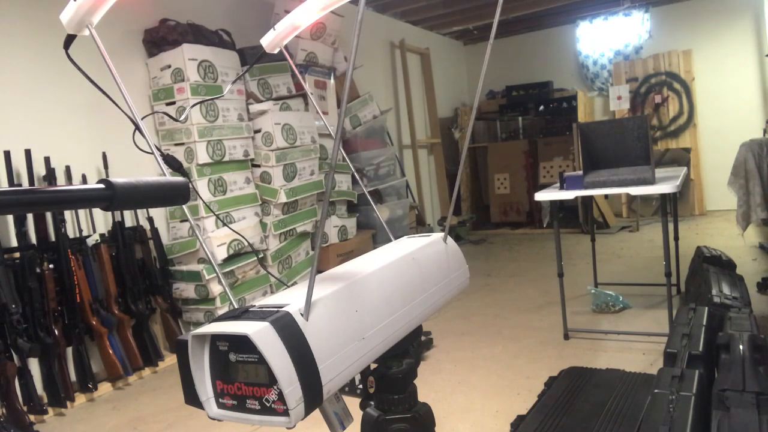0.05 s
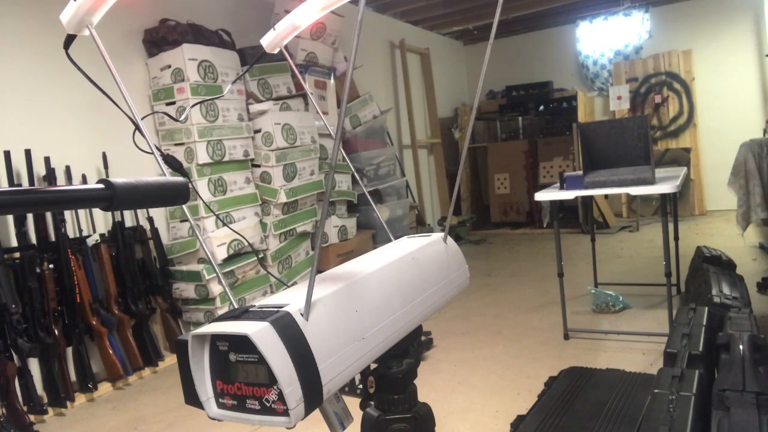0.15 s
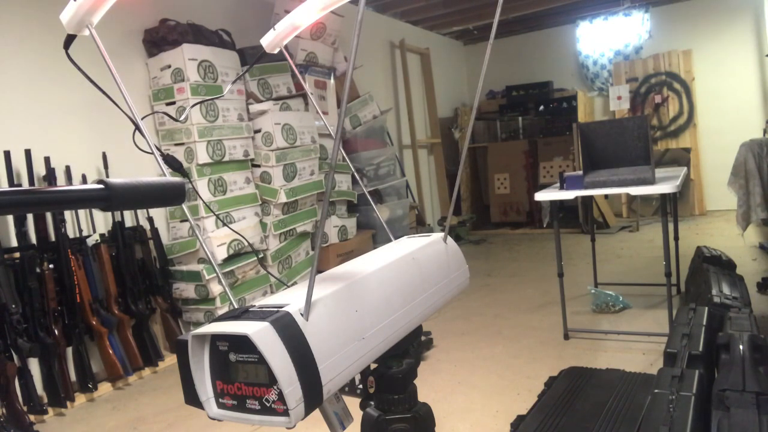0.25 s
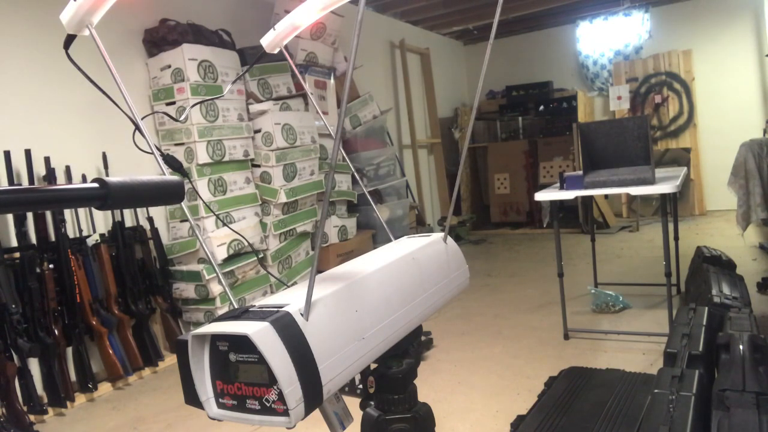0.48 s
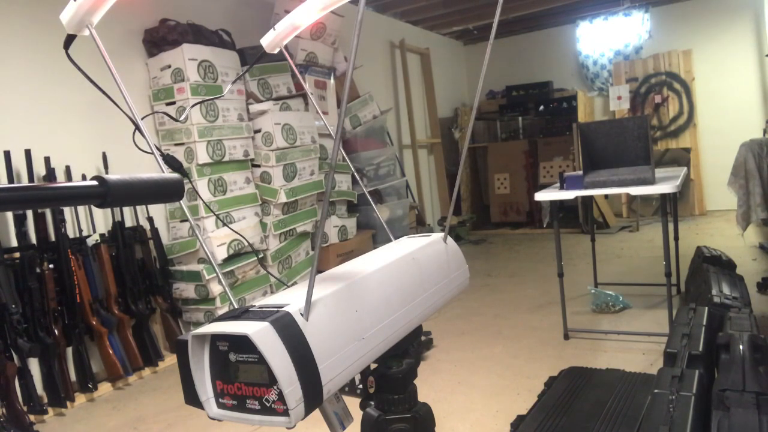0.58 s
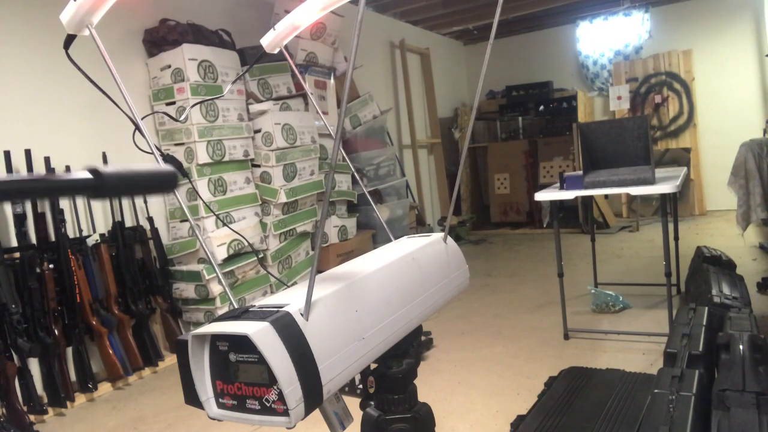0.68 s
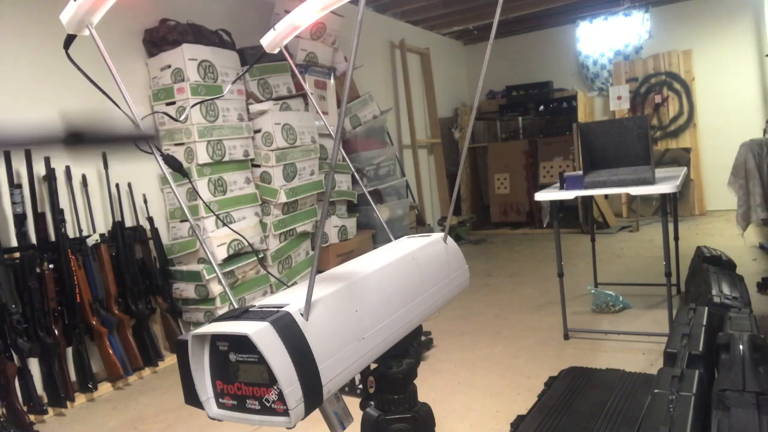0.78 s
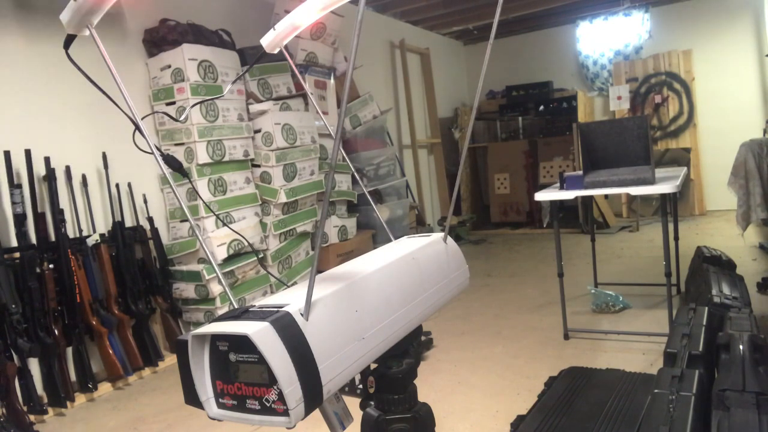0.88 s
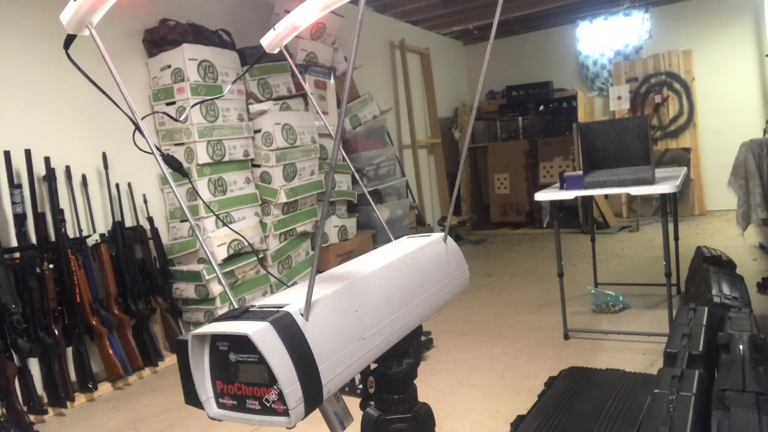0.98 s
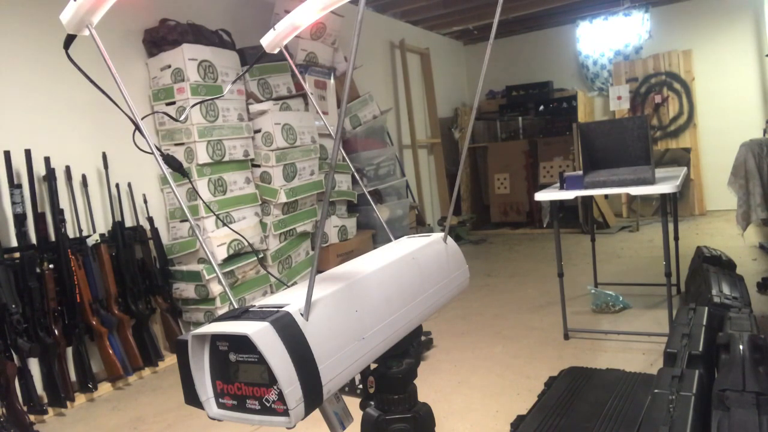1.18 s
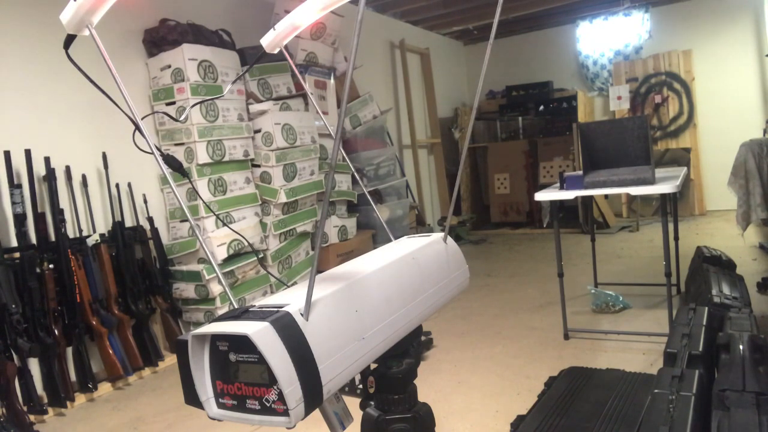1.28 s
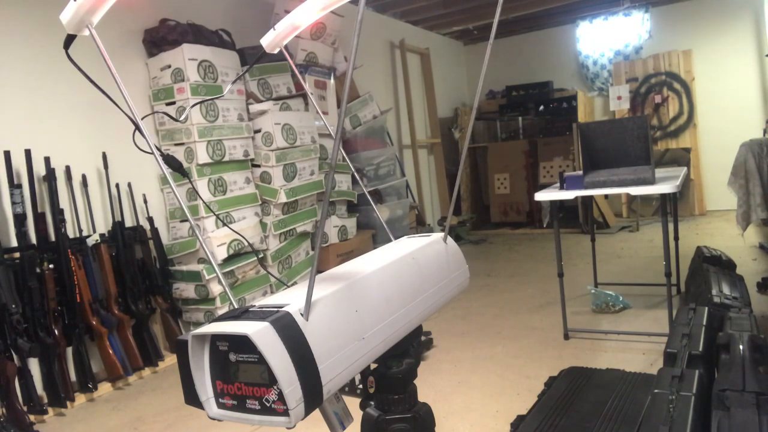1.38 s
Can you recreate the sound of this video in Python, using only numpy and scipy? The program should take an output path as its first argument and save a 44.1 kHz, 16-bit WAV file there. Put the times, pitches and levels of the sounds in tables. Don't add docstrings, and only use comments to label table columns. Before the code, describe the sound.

A spring-piston air rifle fires once close by in a basement: tiny trigger clicks and spring scrape, hard airy crack, low thump, pellet smacking ringing steel down range, then faint hand ticks over quiet hum.

```python
import sys
import numpy as np
from scipy import signal
from scipy.io import wavfile

SR = 44100
rng = np.random.default_rng(int(sys.argv[2]) if len(sys.argv) > 2 else 0)


def wav_record(signal):
    frames = np.transpose(np.atleast_2d(signal))
    bounded = np.clip(frames, -1, 1)
    quanta = np.round(bounded * 32767).astype(np.int16)
    wavfile.write(sys.argv[1], SR, quanta)


def volts_from_decibels(level):
    exponent = np.asarray(level, float) / 20
    return 10 ** exponent


N = 63945
T = np.arange(N) / SR
BLAST_S, THUMP_S, HIT_S = .2008, .2093, .2344
WALLS_BUILD_S = .012


def rms_one(x):
    return x / np.sqrt(np.mean(x ** 2) + 1e-20)


def since(start_s):
    return np.maximum(T - start_s, 0)


def at_hz(points, hz):
    table_hz, value = np.array(points)[:, 0], np.array(points)[:, 1]
    return np.interp(np.log(hz), np.log(table_hz), value)


def drift(rate_hz):
    r = np.exp(-2 * np.pi * rate_hz / SR)
    settle = 9000
    return rms_one(signal.lfilter([1], [1, -2 * r, r * r], rng.standard_normal(N + settle))[settle:])


def click(s, db):
    return volts_from_decibels(db) * (np.arange(N) == int(s * SR))


def ring(x, modes):
    out = 0
    for hz, db, t60 in modes:
        r = volts_from_decibels(-60 / (t60 * SR))
        w = 2 * np.pi * hz / SR
        out = out + volts_from_decibels(db) * signal.lfilter([0, np.sin(w)], [1, -2 * r * np.cos(w), r * r], x + 1e-18)
    return out


def echoes(x, t60):
    tail = rng.standard_normal(N) * volts_from_decibels(-60 * T / t60) * (1 - np.exp(-T / .006))
    return signal.fftconvolve(x, tail / np.sqrt(np.sum(tail ** 2)))[:N]


# frequency in Hz, t60 in seconds.
ROOM_DECAY = [(60, .25), (250, .5), (700, .52), (1500, .54), (3000, .52), (6000, .47), (10000, .37),
              (13000, .29), (16000, .17)]


def room_fade(age, hz, share=1.):
    return volts_from_decibels(-60 * age / (share * at_hz(ROOM_DECAY, hz)))


def bands(spectrum, patchy_db, start=None, attack=1., share=1.):
    edges = 25 * 2 ** np.arange(0, 9.5, 1 / 3)
    white = rng.standard_normal((2, N))
    wobble = [drift(3), drift(25), drift(36)]
    out, power = 0, 0
    for k, (low, high) in enumerate(zip(edges, edges[1:])):
        hz = np.sqrt(low * high)
        band_filter = signal.butter(2, [low, high], "band", fs=SR, output="sos")
        band = volts_from_decibels(at_hz(spectrum, hz)) * signal.sosfilt(band_filter, white[k % 2])
        power += np.mean(band ** 2)
        if start is not None:
            age = since(start)
            band = band * room_fade(age, hz, share) * (1 - np.exp(-age / attack))
        out = out + band * volts_from_decibels(patchy_db * wobble[k % 3])
    return out / np.sqrt(power)


# frequency in Hz, level in dB per Hz.
BLAST_COLOUR = [(200, -15.5), (450, -5), (1000, -12.5), (1500, -9.5), (2200, -4), (4000, -1.5),
                (9000, -7.5), (16000, -12.5)]


def muzzle():
    puff = 1 + 0.24 * np.exp(-since(BLAST_S) / .012)
    return volts_from_decibels(-11.5) * puff * bands(BLAST_COLOUR, 1.2, BLAST_S, attack=.0015)


# frequency in Hz, level in dB, t60 in seconds.
STOCK_MODES = [(150, -17, .08), (260, -27.5, .08), (508.4, -15.5, 0.053), (619.2, -22, .07)]


def piston():
    from_hz, to_hz, fall_s = 215, 50, .008
    level_db, hold_s, t60_s = -16.5, .012, .051
    age = since(THUMP_S)
    hz = to_hz + (from_hz - to_hz) * np.exp(-age / fall_s)
    fade = volts_from_decibels(level_db - 60 * np.maximum(age - hold_s, 0) / t60_s)
    push = np.sin(2 * np.pi * np.cumsum(hz * (age > 0)) / SR) * fade
    knock = ring(click(THUMP_S + .004, 0), STOCK_MODES)
    thump = push + knock
    return thump + volts_from_decibels(-18.5) * echoes(thump, 0.58)


PLATE_HZ = [1241, 1890, 2169, 2530, 2822, 3192, 3660, 4308, 4643, 5415, 6085, 7004, 8037, 9641]
# level in dB, t60 in seconds.
PLATE_RING = [(-15.5, .25), (-13.5, 0.11), (-27, 0.47), (-20, 0.34), (-21, 0.14), (-16.5, 0.17),
              (-15.5, 0.09), (-10.5, 0.11), (-28.5, 0.34), (-14.5, 0.1), (-15.5, 0.049), (-15.5, 0.22),
              (-28.5, 0.07), (-30.5, 0.18)]
FRAME_MODE_HZ = [1430, 1522, 1669, 2051, 2613, 3122, 3531, 3754, 4130, 6620, 8489, 10508]
# level in dB, t60 in seconds.
FRAME_RING = [(-33, .35), (-36, 0.4), (-27, .3), (-27.5, 0.34), (-29, .35), (-19.5, 0.11), (-27.5, 0.43),
              (-28.5, .15), (-22, 0.3), (-23.5, 0.18), (-23, 0.19), (-30.5, 0.092)]
# frequency in Hz, level in dB per Hz.
SPLASH_COLOUR = [(180, -54), (300, -29.5), (994, -35.5), (1230, -17), (1360, -19), (1870, -11.5),
                 (4830, -14.5), (6850, -4), (16000, -10.5)]


def trap():
    plate_direct, frame_direct = .55, .5
    modes = [(hz, *strength, plate_direct) for hz, strength in zip(PLATE_HZ, PLATE_RING)]
    modes += [(hz, *strength, frame_direct) for hz, strength in zip(FRAME_MODE_HZ, FRAME_RING)]
    for hz in np.geomspace(1353.3, 9290, 44):
        minor_hz, minor_db = hz * rng.uniform(0.99, 1.03), -29 + rng.normal(0, 0.67)
        modes.append((minor_hz, minor_db, 0.1 * (2500 / hz) ** 0.13, plate_direct))
    age, hit = since(HIT_S), click(HIT_S, 0)
    build = 1 - np.exp(-age / WALLS_BUILD_S)
    out = 0
    for *mode, near in modes:
        direct = rng.choice([-1, 1]) * ring(hit, [mode])
        paths = rng.standard_normal(N) * build * room_fade(age, mode[0], share=.92)
        walls = ring(paths, [mode])
        mixed = rms_one(near * rms_one(direct) + rms_one(walls))
        out = out + mixed * np.sqrt(np.mean(direct ** 2))
    return out + volts_from_decibels(-17) * bands(SPLASH_COLOUR, 1.5, HIT_S, attack=.003, share=1.04)


# frequency in Hz, level in dB, t60 in seconds.
BAR_MODES = [(770, -29, .77), (951, -39, .9), (1125, -25.5, 1.13)]


def free_bars():
    return ring(click(HIT_S, 0), BAR_MODES) * (1 - np.exp(-since(HIT_S) / WALLS_BUILD_S))


# start in seconds, peak level in dB.
SEAR_CLICKS = [
    (.1805, -35),
    (.1812, -38),
    (.1862, -33),
    (.1872, -31),
    (.1915, -35),
    (.1945, -37),
]
# frequency in Hz, level in dB per Hz.
SCRAPE_COLOUR = [(180, -42), (300, -10), (2250, -8), (2570, -5), (2840, -8), (13100, -20.5), (16000, -29)]


def action():
    impulses = sum(click(s, db) for s, db in SEAR_CLICKS)
    clicks = signal.lfilter([1, -1], [1, -.3], impulses)
    start_s, end_s = .181, .202
    along = (T - start_s) / (end_s - start_s)
    gate = np.clip(along * 8, 0, 1) * (along < 1.5)
    scrape = gate * volts_from_decibels(-50 + 9 * np.clip(along, 0, 1)) * bands(SCRAPE_COLOUR, 2.0)
    return clicks + volts_from_decibels(-9.5) * echoes(clicks, .1) + scrape


# time in seconds, level in dB.
SLEEVE_BRUSH = [
    (1.06, -63),
    (1.096, -68.5),
    (1.18, -64.5),
    (1.348, -67),
    (1.45, -72.5),
]
# frequency in Hz, level in dB per Hz.
CLOTH_COLOUR = [(1200, -26), (2500, -6), (4500, -3.5), (7000, -2.5), (10000, -7.5), (12500, -2.5),
                (14000, -4), (16000, -8)]


def sleeve():
    level_db = np.interp(T, *np.transpose([(1.03, -100), *SLEEVE_BRUSH]))
    return volts_from_decibels(level_db) * bands(CLOTH_COLOUR, 1.2)


# start in seconds, click level in dB, hiss level in dB,
# hiss t60 in seconds, low edge in Hz.
HAND_TICKS = [
    (.8335, -52, -60, .22, 10000),
    (.834, -58, -70, .2, 4500),
    (.997, -54, -72, .3, 1500),
    (1.0453, -33, -61, .12, 4000),
]
# frequency in Hz, level in dB, t60 in seconds.
TICK_MODES = [(5700, -31, .08), (13000, -31, .12)]


def ticks():
    out = 0
    for s, db, hiss_db, t60, low_hz in HAND_TICKS:
        hiss = rng.standard_normal(N) * (T > s) * volts_from_decibels(hiss_db - 60 * since(s) / t60)
        tap = click(s, db)
        tick = np.convolve(tap, [.5, .5])[:N] + ring(tap, TICK_MODES) + hiss
        out = out + signal.sosfilt(signal.butter(3, low_hz, "high", fs=SR, output="sos"), tick)
    return out


# centre in seconds, pitch in Hz, level in dB, length in seconds.
FINGER_SQUEAKS = [
    (.915, 1560, -74, 0.021),
    (1.168, 4520, -69, 0.056),
    (1.349, 2690, -66, 0.037),
    (1.433, 2010, -65.5, 0.032),
]


def squeaks():
    out = 0
    for s, hz, db, length in FINGER_SQUEAKS:
        swell = np.exp(-2 * ((T - s) / length * 2) ** 2)
        out = out + volts_from_decibels(db) * swell * np.sin(2 * np.pi * hz * T + 0.97 * drift(67))
    return out


# frequency in Hz, level in dB per Hz.
TONE_COLOUR = [(15, -36), (25, -12), (102, -0.5), (775, -15), (863, -16), (1130, -17.5), (1840, -20),
               (2050, -20.5), (16000, -30)]
# frequency in Hz, level in dB.
MACHINE_HUM = [(100, -72.5), (225, -72), (390, -79.5), (572, -76)]


def room_tone():
    hum = 0
    for hz, db in MACHINE_HUM:
        level = volts_from_decibels(db + 3 * drift(6))
        pitch = hz * (1 + 0.0033 * drift(15))
        hum = hum + level * np.sin(2 * np.pi * np.cumsum(pitch) / SR)
    return volts_from_decibels(-64.5) * bands(TONE_COLOUR, 1.4) + hum


def scene():
    shot = volts_from_decibels(6.5) * (muzzle() + piston() + trap())
    handling = sleeve() + ticks() + squeaks()
    return (shot + free_bars() + action() + handling + room_tone())[None]


def top_cut(x):
    return signal.sosfilt(signal.butter(12, 16470, fs=SR, output="sos"), x)


# seconds after the crack, gain in dB.
GAIN_DUCK = [
    (0, -0.5),
    (.003, -4.5),
    (.07, -4),
    (.205, -9),
    (.36, 0),
]


def record(dry):
    x = dry * volts_from_decibels(np.interp(T - BLAST_S, *np.transpose(GAIN_DUCK)))
    x = signal.sosfilt(signal.butter(2, 40, "high", fs=SR, output="sos"), x)
    ceiling = 1.3
    x = ceiling * np.tanh(x / ceiling)
    x = signal.sosfilt(signal.cheby2(12, 70, 16500, fs=SR, output="sos"), x)
    return top_cut(x)


dry = scene()
out = record(dry)
wav_record(out)
```